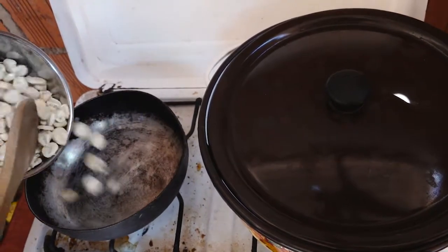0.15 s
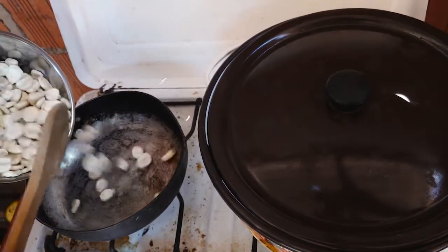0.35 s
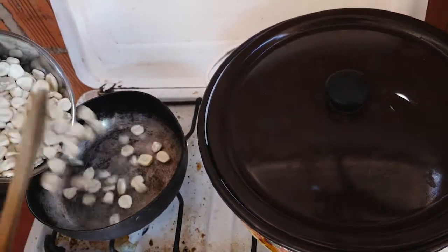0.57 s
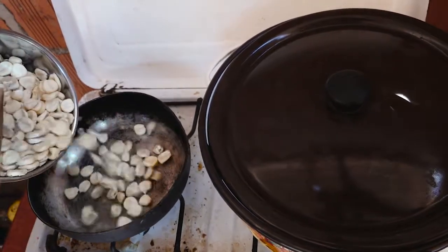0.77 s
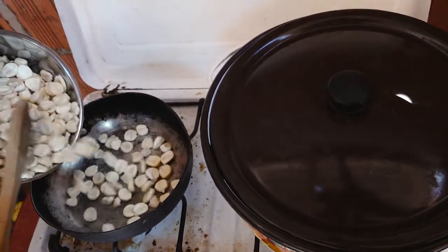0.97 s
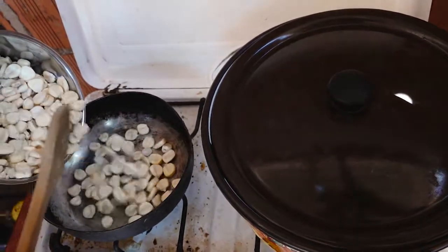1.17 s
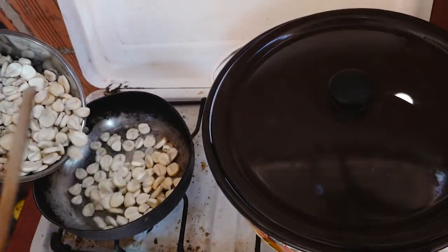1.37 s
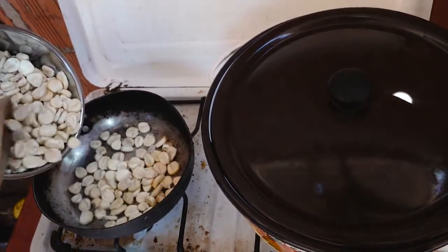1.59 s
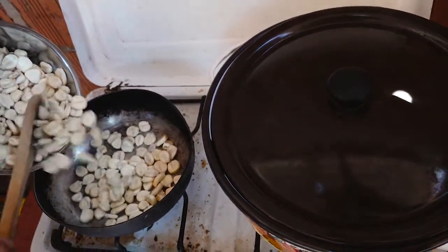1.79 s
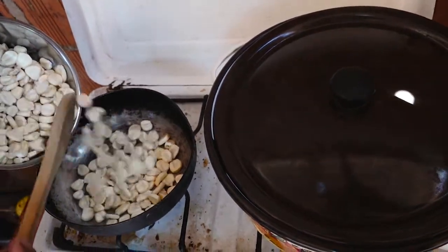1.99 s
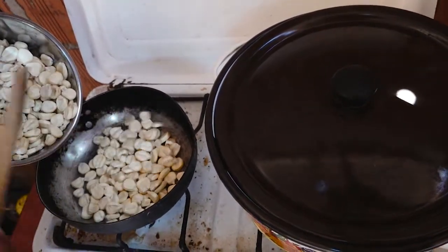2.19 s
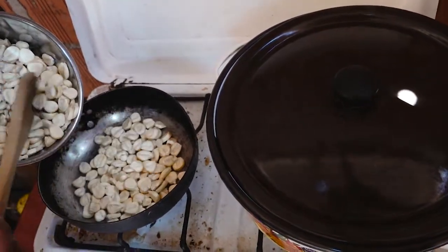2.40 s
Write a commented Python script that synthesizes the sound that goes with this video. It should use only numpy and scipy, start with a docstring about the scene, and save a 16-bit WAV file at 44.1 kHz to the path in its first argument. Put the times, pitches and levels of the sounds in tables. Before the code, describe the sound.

Dried corn pouring into a dry metal pan, close in a small kitchen. Kernels shift softly in a steel bowl until 0.2 s, then the loudest, brightest clacks ring the bare pan. Dense rattling grows drier as corn covers the metal, thinning by 1.55 s. A spoon rubs and lightly knocks the bowl; a second, duller pour runs 1.8-2.2 s, then last tiny ticks and a soft knock at 2.4 s over quiet air.

```python
"""Corn poured into a dry pan

In a kitchen, a wooden spoon pushes dried kernels from a steel bowl into a dry metal pan, in two pours.
Each landing is a noise clack, thickened by the close stove lid and wall, plus decaying sine modes of the pan;
the growing layer of corn damps that ring. Random small bounces rattle between the landings.
Corn slips are noise through bowl resonances; the spoon rubs and knocks the bowl over steady room air."""
import sys
import numpy as np
from scipy import signal
from scipy.fft import rfft, irfft, next_fast_len
from scipy.io import wavfile
from scipy.ndimage import map_coordinates

SR = 44100
rng = np.random.default_rng(int(sys.argv[2]) if len(sys.argv) > 2 else 0)


def master_out(mix):
    """Clip the mix to full scale and print it as 16-bit PCM to the path in sys.argv[1]."""
    frames = np.transpose(np.atleast_2d(mix))
    ceiling = np.clip(frames, -1, 1)
    pcm = np.round(ceiling * 32767).astype(np.int16)
    wavfile.write(sys.argv[1], SR, pcm)


N = 108045
STRIKE_SIZE = 16384  # samples in one strike

# Kernels landing in the pan: (time [s], relative level [dB], belly near 1 kHz [dB],
# middle near 2 kHz [dB], hard edge above 7 kHz [dB]); the tone columns count from their means
LANDINGS = [(0.2219, -9, -26, -11.5, -16.5), (0.2514, -13, -24, -9, -25.5),
            (0.2605, -9.5, -17.5, -26, -13.5), (0.2703, -15.5, -12, -6.5, -18),
            (0.2972, -21, -6.5, -10, -21), (0.3353, -23, -28, -9, -12), (0.3729, -13.5, -21.5, -13, -13),
            (0.4204, -13.5, -14, -8, -9), (0.4471, -11, -26.5, -15.5, -18.5),
            (0.4754, -14, -11.5, -13.5, -13), (0.4956, -23.5, -19, -3, -9.5),
            (0.5183, -14.5, -28, -13, -11), (0.5706, -20, -22, -5.5, -14.5), (0.5922, -23.5, -10, -14, -20),
            (0.6104, -16.5, -21, -8.5, -26), (0.6158, -12.5, -29, -16, -12),
            (0.6387, -26, -12.5, -4.5, -46), (0.6756, -14, -22, -7, -15.5), (0.712, -11, -25, -14, -17),
            (0.7215, -17, -12.5, -8, -10), (0.7411, -21.5, -13, -18, -16), (0.7944, -21, -14, -16, -15),
            (0.8346, -21.5, -13, -5.5, -13), (0.858, -13.5, -23, -13, -15), (0.8836, -23, -9.5, -7, -12),
            (0.9104, -17, -11.5, -13, -14.5), (0.9694, -19.5, -20, -11, -16.5),
            (0.9937, -19.5, -15.5, -7, -16), (1.0442, -27.5, -11.5, -7, -13),
            (1.077, -22.5, -16, -10.5, -24), (1.1093, -18, -18, -12.5, -13),
            (1.135, -17, -20, -13.5, -19.5), (1.1703, -24, -21, -6, -12), (1.199, -20.5, -20, -15, -16.5),
            (1.2189, -19, -14.5, -6, -11), (1.2486, -18.5, -16.5, -9.5, -11.5),
            (1.2689, -15.5, -24, -10.5, -13), (1.2848, -24, -12, -5, -23),
            (1.3291, -20.5, -21.5, -10.5, -15.5), (1.3582, -23, -27, -11.5, -10),
            (1.3929, -22.5, -19, -10.5, -17.5), (1.426, -24, -27, -18, -9.5),
            (1.4454, -19.5, -32, -15, -20), (1.4754, -20, -48, -13.5, -23), (1.5178, -36, -35, -2, -45),
            (1.5439, -20, -20, -12.5, -20), (1.6041, -21, -9, -9, -16), (1.6675, -32, -11, -9, -38),
            (1.7725, -36.5, -14, -5.5, -18), (1.8041, -15.5, -28, -15.5, -17),
            (1.8482, -19.5, -27.5, -11, -15), (1.8724, -26.5, -17, -11, -18),
            (1.9033, -22.5, -23, -13.5, -17), (1.9195, -18, -13.5, -17, -20.5),
            (1.9449, -19, -10, -7.5, -14.5), (1.9683, -17, -15, -16.5, -13.5),
            (1.9993, -25.5, -6.5, -5, -8), (2.0248, -28.5, -9, -10, -12), (2.046, -25.5, -8, -10, -24),
            (2.0662, -18.5, -8.5, -13, -13.5), (2.0932, -21.5, -5.5, -12, -18),
            (2.118, -14.5, -17.5, -14, -13.5), (2.1274, -16.5, -16, -22, -16.5),
            (2.1703, -31, -2.5, -6.5, -27), (2.2023, -23, -12.5, -10.5, -12), (2.2485, -34, -28, -16, -11),
            (2.3133, -34.5, -22, -26, -2), (2.339, -39, -17, -16, -12), (2.376, -43, -5.5, -11, -1)]
# Spectrum of a kernel on metal: (frequency [Hz], relative level [dB])
CLACK_SPECTRUM = [(300, -43), (700, -21), (1000, -9), (1270, -9.5), (1900, -2), (2800, -7.5), (3700, -10),
                  (5500, -8.5), (8300, -13), (10500, -21), (13000, -26), (15800, -38)]
# Broad resonances of the loaded pan: (frequency [Hz], width [Hz], relative level [dB])
PAN_BODY = [(1066, 102, -4), (1500, 14, -15), (2045, 22, -0.5), (2410, 75, -2), (3350, 170, -1),
            (3947, 28, -0.5), (4310, 43, 4.5), (5325, 107, -2.5), (6514, 130, -4.5), (6700, 43, -19.5),
            (8180, 170, -9.5), (9780, 114, -12.5)]
# Ringing modes of the bare pan: (frequency [Hz], relative level [dB], T60 [s])
PAN_MODES = [(1010, -13, 0.14), (1031, -8.5, 0.36), (1097, -15.5, 0.66), (1132, -8, 0.12),
             (1487, -10.5, 0.42), (1857, -17.5, 0.45), (2097, -3.5, 0.26), (3202, -10, 0.52),
             (3313, -12, 0.46), (4077, -10.5, 0.16), (4111, -6.5, 0.25), (4590, -12.5, 0.06),
             (5144, -0.5, 0.13), (7220, -25, 0.11)]
# Flow of small bounces: (time [s], relative level [dB])
BOUNCE_FLOW = [(0.22, -36), (0.3, -30), (0.4, -38.5), (0.5, -42), (0.56, -35), (0.66, -30.5), (0.8, -27),
               (0.92, -33), (1.04, -35.5), (1.14, -31), (1.3, -29.5), (1.48, -44.5), (1.621, -36),
               (1.75, -54), (1.86, -44), (1.98, -28.5), (2.08, -32.5), (2.23, -44.5), (2.3, -65),
               (2.45, -55)]
# Corn shifting in the bowl: (time [s], relative level [dB])
CORN_SLIPS = [(0.0, -42.5), (0.058, -39), (0.073, -39), (0.090, -48), (0.108, -40.5), (0.125, -47),
              (0.139, -38.5), (0.159, -38), (0.182, -38.5), (0.205, -42.5), (1.73, -52)]
# Resonances of the steel bowl: (frequency [Hz], width [Hz], relative level [dB])
BOWL_BODY = [(2860, 62, 3.5), (3330, 89, 4.5), (4850, 76, 0.5), (5130, 38, 9), (6100, 110, 0.5)]
# Spectrum of the shifting corn: (frequency [Hz], relative level [dB])
SLIP_SPECTRUM = [(180, -46), (300, -40), (592, -17), (723, -8), (1800, -8.5), (2680, 3), (3110, -5),
                 (5030, -1), (15800, -25.5)]
# Spoon rubbing the bowl: (time [s], standard deviation of the swell [s], level [dB], pitch [Hz])
SPOON_RUBS = [(0.124, 0.025, -55.5, 770), (0.188, 0.027, -52.5, 780), (0.248, 0.019, -56.5, 450),
              (1.578, 0.016, -47.5, 660), (1.622, 0.019, -62, 596), (2.14, 0.15, -62, 266),
              (2.34, .025, -56, 250), (2.38, 0.0095, -48.5, 780)]
# Spectrum of rubbing wood: (frequency [Hz], relative level [dB])
WOOD_SPECTRUM = [(100, -2), (250, -5), (480, -4), (750, 1), (1000, -4), (2000, -16), (6000, -43)]
# Spoon knocking the bowl: (time [s], relative level [dB])
SPOON_KNOCKS = [(1.773, -46), (2.406, -41.5)]
# Modes of a knock: (frequency [Hz], relative level [dB], T60 [s])
KNOCK_MODES = [(750, -11, .08), (1173, -6, .1), (1980, 2, 0.053), (2130, -11, 0.13), (3500, -17, .08)]
# Spectrum of the kitchen air: (frequency [Hz], relative level [dB])
AIR_SPECTRUM = [(25, -7.5), (60, -7), (150, -6.5), (300, -7), (700, -4), (2000, -8), (6000, -15.5),
                (11000, -38), (15800, -41)]

LANDING_DB, BODY_DB, RING_DB, BOWL_DB, AIR_DB = -12, 1, 0, -2, -54.5
# One clack with its close reflections
ATTACK_S, HOLD_S, FALL_T60_S = 0.00023, 0.0097, 0.12
WALL_S, WALL_DB = 0.011, 2.5  # the wall's answer lifts the clack a moment after contact
ROOM_DB, ROOM_DULL_HZ, ROOM_T60_S = -6, 9100, 0.29  # the kitchen's duller tail
SPOT_DB, SPOT_WIDTH_HZ = 4, 170  # every kernel and spot favours other partials
# Sharp edges touching as a kernel tips over
TICK_DB, TICK_SPREAD_DB, TICK_T60_S, TICK_HZ, TICK_WINDOW_S = -4.5, 4, 0.0083, 6050, 0.012
# Pan and the corn covering its bottom
COVER_START_S, COVER_S, DAMP_DB, CORN_T60_S = 0.79, 0.35, 6.5, 0.3
BARE_SHIFT = 0.023  # share by which the broad resonances lie lower on a bare bottom
DETUNE = 0.003  # random share by which kernels on the metal pull a mode
RING_RISE_S, LOW_CUT_HZ = 0.0043, 755
# Small bounces, softer than landings
BOUNCES_PER_S, BOUNCE_SPREAD_DB, BOUNCE_T60_S = 220, 3.5, 0.073
BOUNCE_DB, BOUNCE_DULL_HZ = -3, 10500
RUB_WIDTH_HZ, RUB_PITCH_DB = 170, 7
TOP_HZ = 15850  # band limit of the recorder


def landings():
    """Each kernel clacks and rings the pan, less as the bottom fills with time."""
    out = np.zeros(N)
    t = np.arange(STRIKE_SIZE) / SR
    hz = np.fft.rfftfreq(STRIKE_SIZE, 1 / SR)
    usual_tone = np.mean(LANDINGS, axis=0)[2:]
    for s, db, *tone in LANDINGS:
        belly, middle, edge = np.array(tone) - usual_tone
        colour = [(1150, belly), (1500, middle), (2300, middle), (3000, 0), (4800, 0.019), (8500, edge)]
        cover = np.clip((s - COVER_START_S) / COVER_S, 0, 1)
        plain = pan_colour(hz, cover)
        gain = plain * amp(along(colour, hz))
        # clack() evens out loudness, so restore what the colour adds or takes
        loudness = np.linalg.norm(gain) / np.linalg.norm(plain)
        contact = loudness * clack(gain) + amp(edge / 2) * ticks(count=3)
        ring = amp(RING_DB - cover * DAMP_DB) * pan_ring(t, colour, cover, scatter_db=1)
        add(out, s, amp(db + LANDING_DB) * (contact + ring))
    return out


def pan_colour(hz, cover):
    """Gain of a clack through the pan's broad resonances; cover 0 is bare, 1 is covered with corn."""
    shifted_hz = hz * (1 + BARE_SHIFT * (1 - cover))
    body_power = amp(BODY_DB) ** 2 * humps(PAN_BODY, shifted_hz)
    return np.sqrt(amp(along(CLACK_SPECTRUM, hz)) ** 2 + body_power)


def clack(gain):
    """Sharp attack, a plateau of close reflections, a quick fall and the room's duller tail."""
    t = np.arange(STRIKE_SIZE) / SR
    hz = np.fft.rfftfreq(STRIKE_SIZE, 1 / SR)
    random_db = SPOT_DB * rng.standard_normal(STRIKE_SIZE // 16)
    spot_gain = gain * amp(map_coordinates(random_db, [hz / SPOT_WIDTH_HZ], mode="wrap"))
    wall_lift = amp(WALL_DB * (np.minimum(t / WALL_S, 1) - 1))
    near = noise(spot_gain, STRIKE_SIZE) * fade(t - HOLD_S, FALL_T60_S) * wall_lift
    dull_gain = spot_gain / np.hypot(1, (hz / ROOM_DULL_HZ) ** 2)
    far = noise(dull_gain, STRIKE_SIZE) * amp(ROOM_DB) * fade(t, ROOM_T60_S)
    return (1 - np.exp(-t / ATTACK_S)) * (near + far)


def ticks(count):
    """A few very short bright clicks of one kernel's edges."""
    out = np.zeros(STRIKE_SIZE)
    size = STRIKE_SIZE // 16
    t, hz = np.arange(size) / SR, np.fft.rfftfreq(size, 1 / SR)
    gain = amp(along(CLACK_SPECTRUM, hz)) * hz / np.hypot(hz, TICK_HZ)
    for _ in range(count):
        s = TICK_WINDOW_S * rng.random()
        level = amp(TICK_DB + TICK_SPREAD_DB * rng.standard_normal())
        add(out, s, level * noise(gain, size) * fade(t, TICK_T60_S))
    return out


def pan_ring(t, colour, cover, scatter_db):
    """The pan's modes, struck at a new spot each time; corn lying on the metal adds its own loss."""
    hz, db, t60 = np.transpose(PAN_MODES)
    gain = amp(db + along(colour, hz) + scatter_db * rng.standard_normal(len(hz)))
    pulled_hz = hz * (1 + DETUNE * rng.standard_normal(len(hz)))
    phase = 2 * np.pi * (np.outer(pulled_hz, t) + rng.random((len(hz), 1)))
    modes = gain @ (np.sin(phase) * fade(t, t60[:, None]))
    return modes * (1 - np.exp(-t / RING_RISE_S)) * fade(cover * t, CORN_T60_S)


def bounces():
    """Many small random contacts as the kernels skip and settle."""
    t, hz = np.arange(N) / SR, np.fft.rfftfreq(N, 1 / SR)
    hits = rng.random(N) < BOUNCES_PER_S / SR
    sizes = hits * amp(BOUNCE_SPREAD_DB * rng.standard_normal(N))
    decay_power = fade(t[:STRIKE_SIZE], BOUNCE_T60_S) ** 2
    power = np.abs(signal.fftconvolve(sizes ** 2, decay_power)[:N])
    gain = pan_colour(hz, 0.83) / np.hypot(1, (hz / BOUNCE_DULL_HZ) ** 2)
    rattle = unit(np.sqrt(power) * noise(gain, N))
    s, db = np.transpose(BOUNCE_FLOW)
    return rattle * amp(np.interp(t, s, db) + BOUNCE_DB) * (t > LANDINGS[0][0])


def bowl():
    """Corn shifts in short slips against the resonant steel bowl."""
    out = np.zeros(N)
    hz = np.fft.rfftfreq(STRIKE_SIZE, 1 / SR)
    body_power = amp(BOWL_DB) ** 2 * humps(BOWL_BODY, hz)
    gain = np.sqrt(amp(along(SLIP_SPECTRUM, hz)) ** 2 + body_power)
    for s, db in CORN_SLIPS:
        add(out, s, amp(db) * clack(gain))
    return out


def spoon():
    """Dull noise swells of wood rubbing in the bowl, and light knocks of decaying sines."""
    out = np.zeros(N)
    t, hz = np.arange(N) / SR, np.fft.rfftfreq(N, 1 / SR)
    for s, spread_s, db, pitch in SPOON_RUBS:
        pitch_power = humps([(pitch, RUB_WIDTH_HZ, RUB_PITCH_DB)], hz)
        gain = np.sqrt(amp(along(WOOD_SPECTRUM, hz)) ** 2 + pitch_power)
        swell = np.exp(-0.5 * ((t - s) / spread_s) ** 2)
        out += amp(db) * swell * noise(gain, N)
    knock = sum(amp(db) * np.sin(2 * np.pi * f * t) * fade(t, t60) for f, db, t60 in KNOCK_MODES)
    for s, db in SPOON_KNOCKS:
        add(out, s, amp(db) * knock)
    return out


def room_air():
    """Steady shaped noise of the kitchen air."""
    hz = np.fft.rfftfreq(N, 1 / SR)
    return amp(AIR_DB) * noise(amp(along(AIR_SPECTRUM, hz)), N)


def amp(db):
    """Decibels to gain."""
    return 10 ** (np.asarray(db) / 20)


def unit(x):
    """Scale to rms 1."""
    return x / np.sqrt(np.mean(x ** 2) + 1e-20)


def along(points, hz):
    """(frequency [Hz], value) points read on a log frequency axis."""
    f, v = np.transpose(points)
    return np.interp(np.log(hz + 1), np.log(f + 1), v)


def humps(rows, hz):
    """Summed power response of (frequency [Hz], width [Hz], level [dB]) resonances with steep skirts."""
    return sum(amp(db) ** 2 / (1 + ((hz - centre) / width) ** 2) ** 2 for centre, width, db in rows)


def noise(gain, size):
    """Noise of rms 1 shaped by the given gain at each frequency."""
    return unit(irfft(rfft(rng.standard_normal(size)) * gain, size))


def fade(t, t60):
    """Exponential decay by 60 dB in t60 seconds, flat before time zero."""
    return np.exp(-np.log(1000) * np.maximum(t, 0) / t60)


def add(track, s, sound):
    """Mix a sound in at time s [s]."""
    part = track[max(0, round(s * SR)):][:len(sound)]
    part += sound[:len(part)]


def scene():
    """The small pan radiates little bass; bowl, spoon and room air lie beneath it."""
    low_cut = signal.butter(6, LOW_CUT_HZ, "high", fs=SR, output="sos")
    pan = signal.sosfilt(low_cut, landings() + bounces())
    return (pan + bowl() + spoon() + room_air())[None]


def record(dry):
    """The recorder keeps nothing above its band limit."""
    size = next_fast_len(N + STRIKE_SIZE)
    passband = np.fft.rfftfreq(size, 1 / SR) < TOP_HZ
    return irfft(rfft(dry, size) * passband, size)[:, :N]


dry = scene()
out = record(dry)
master_out(out)
```